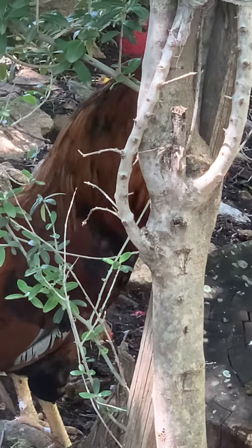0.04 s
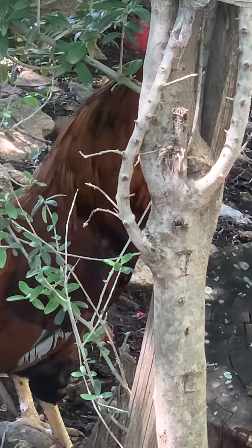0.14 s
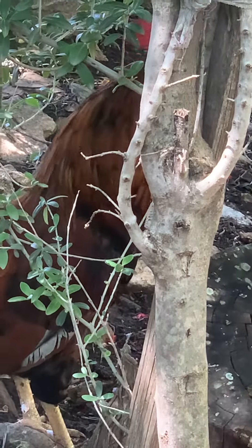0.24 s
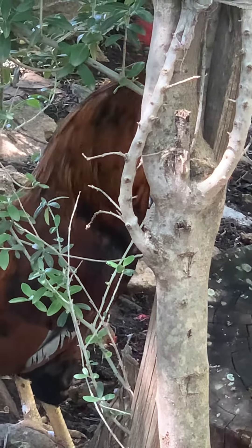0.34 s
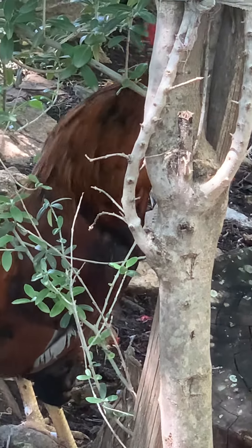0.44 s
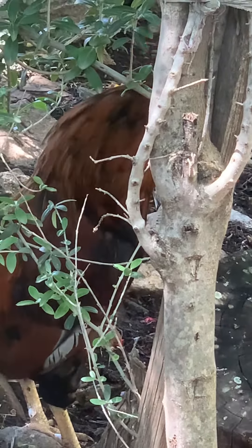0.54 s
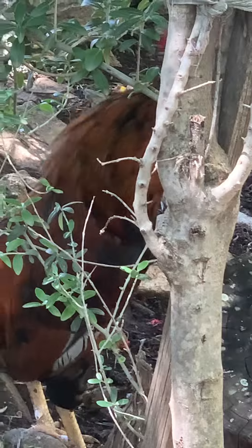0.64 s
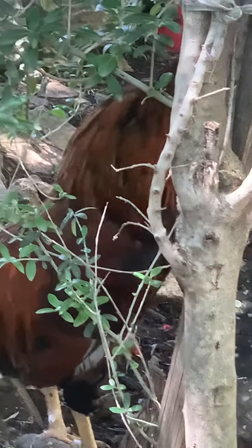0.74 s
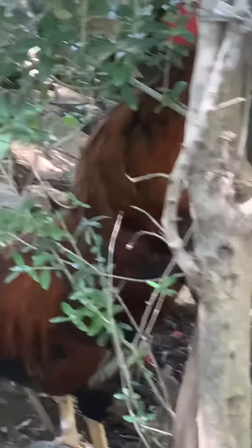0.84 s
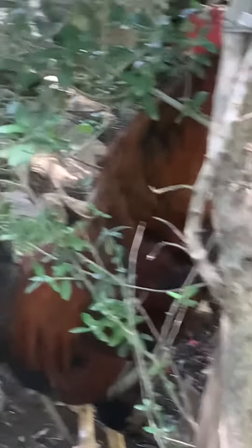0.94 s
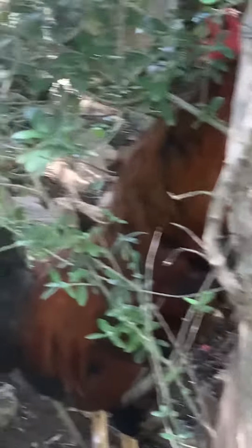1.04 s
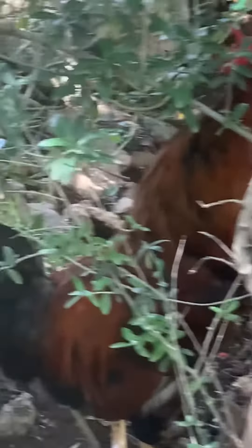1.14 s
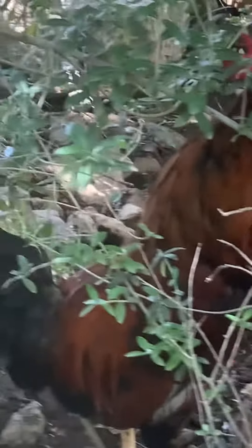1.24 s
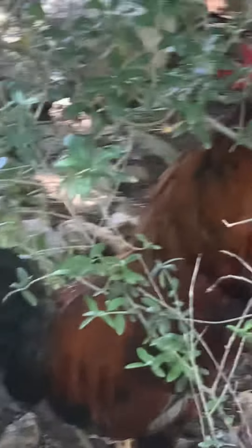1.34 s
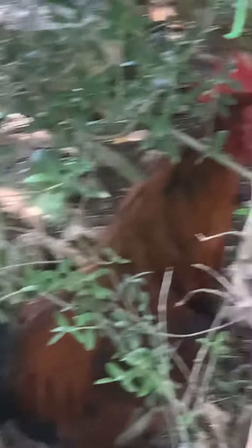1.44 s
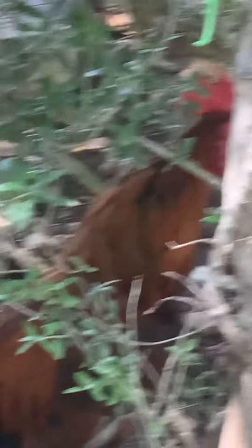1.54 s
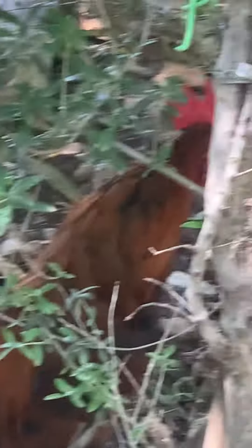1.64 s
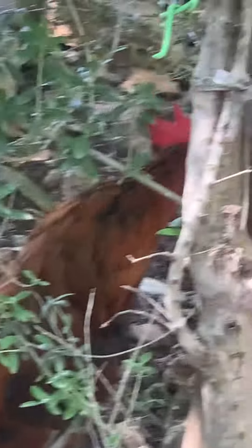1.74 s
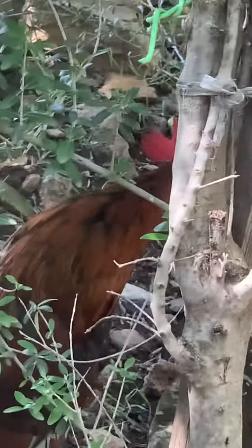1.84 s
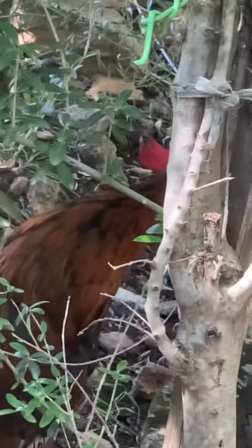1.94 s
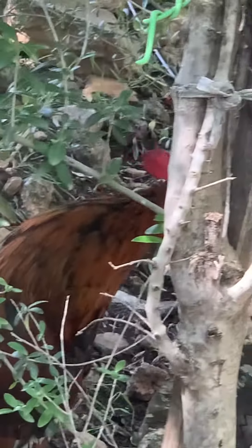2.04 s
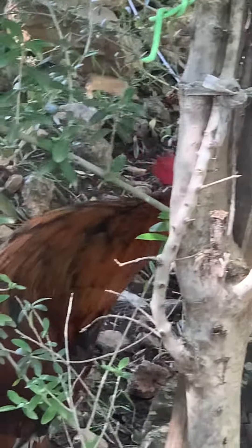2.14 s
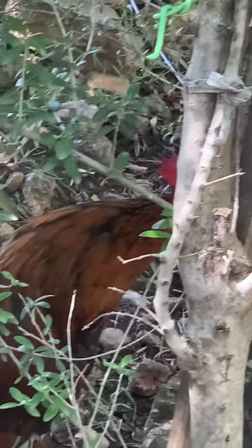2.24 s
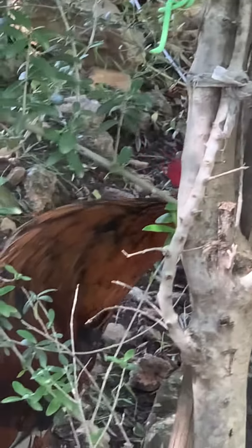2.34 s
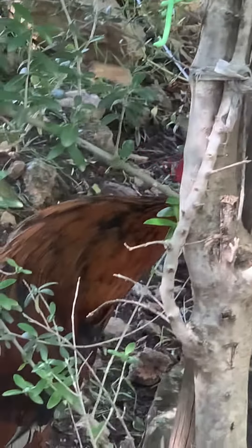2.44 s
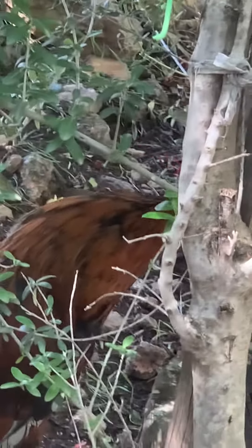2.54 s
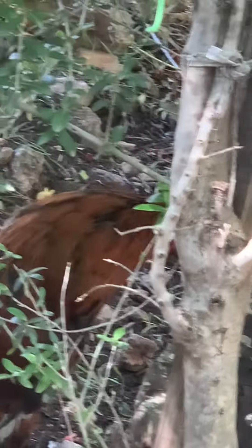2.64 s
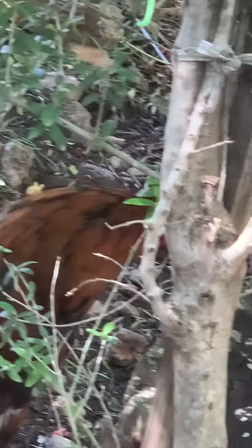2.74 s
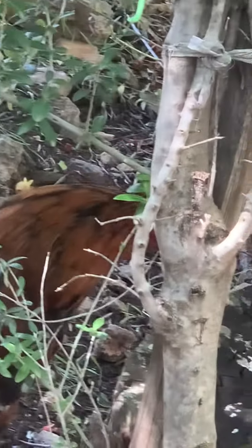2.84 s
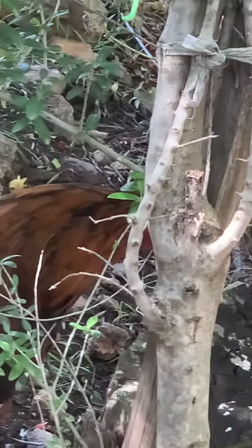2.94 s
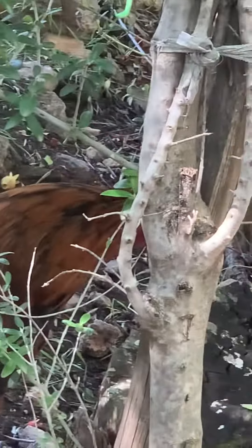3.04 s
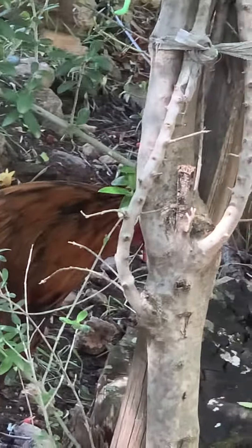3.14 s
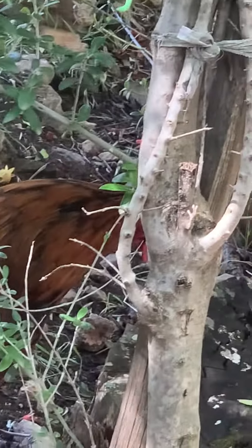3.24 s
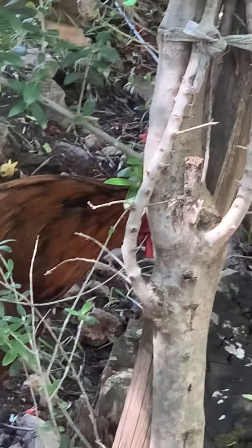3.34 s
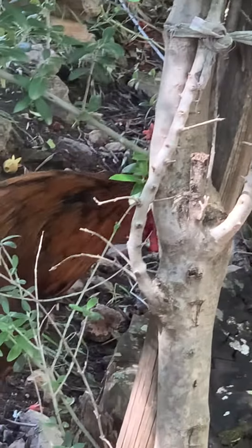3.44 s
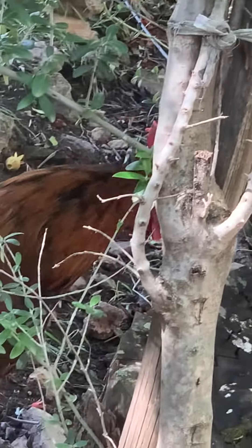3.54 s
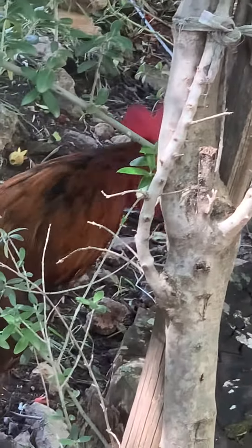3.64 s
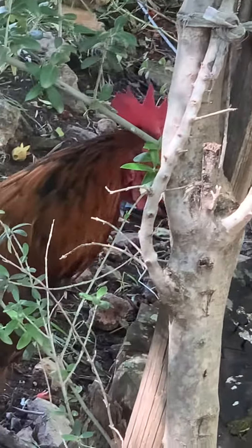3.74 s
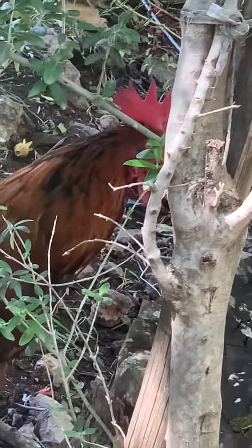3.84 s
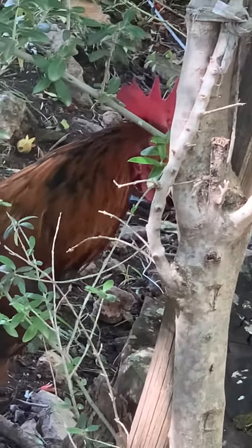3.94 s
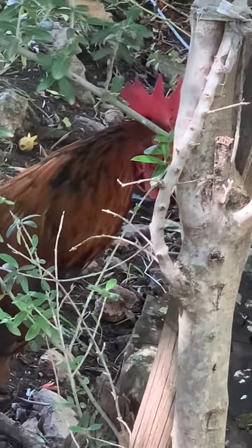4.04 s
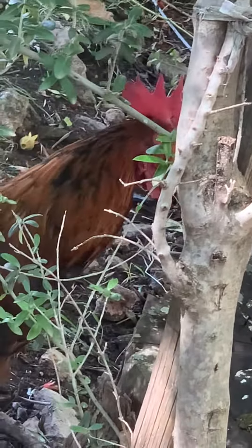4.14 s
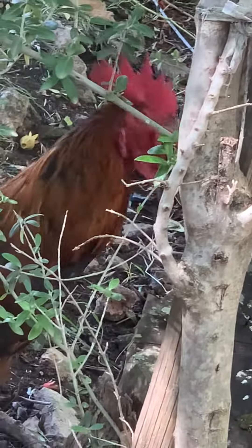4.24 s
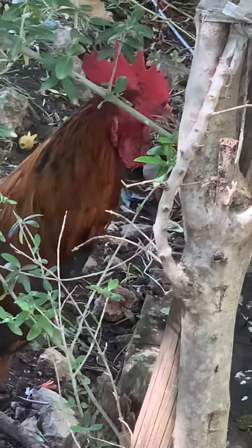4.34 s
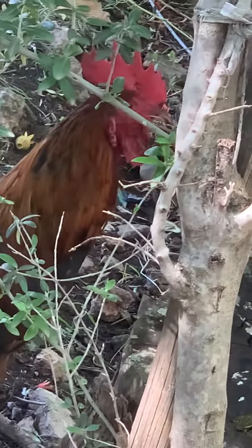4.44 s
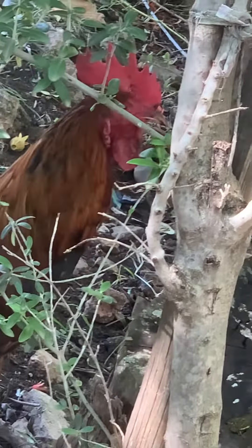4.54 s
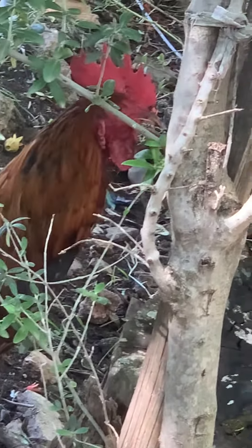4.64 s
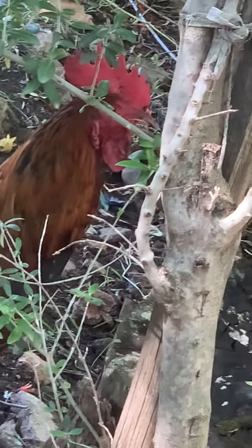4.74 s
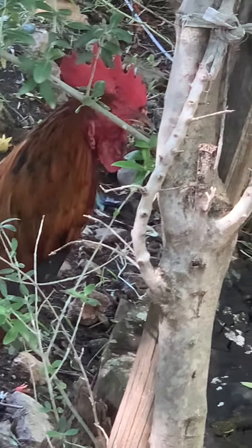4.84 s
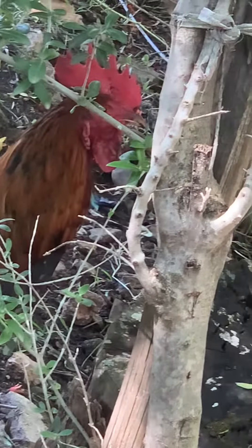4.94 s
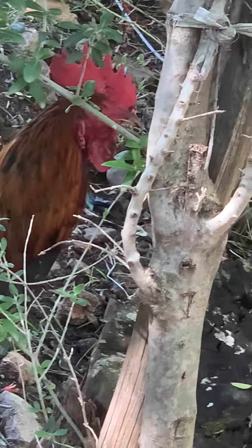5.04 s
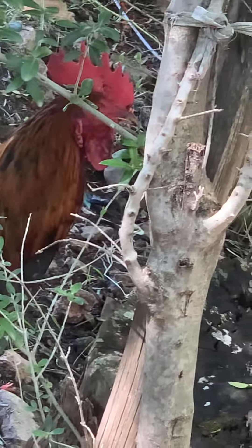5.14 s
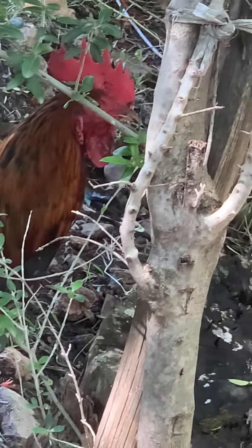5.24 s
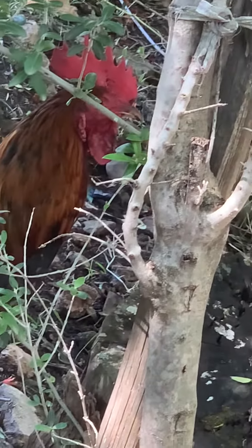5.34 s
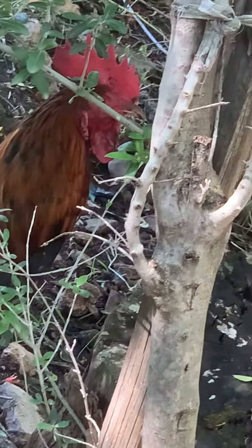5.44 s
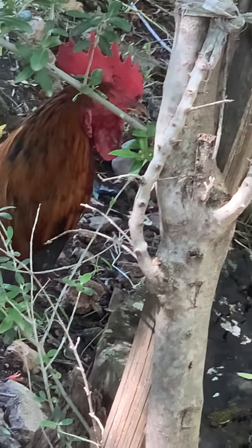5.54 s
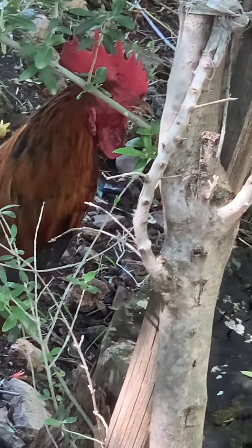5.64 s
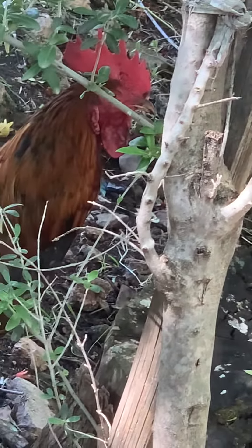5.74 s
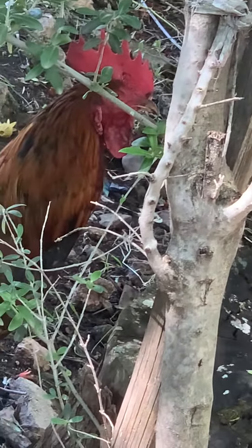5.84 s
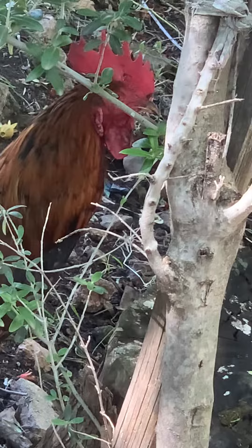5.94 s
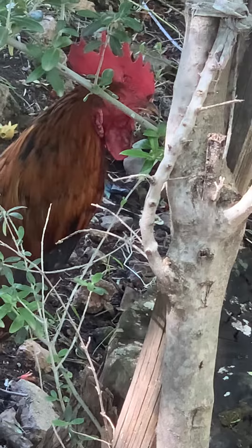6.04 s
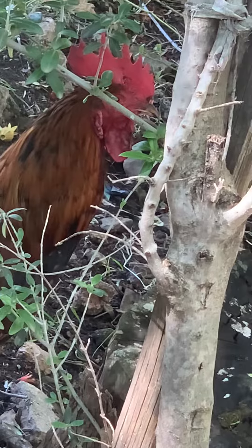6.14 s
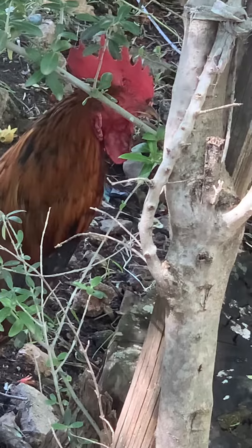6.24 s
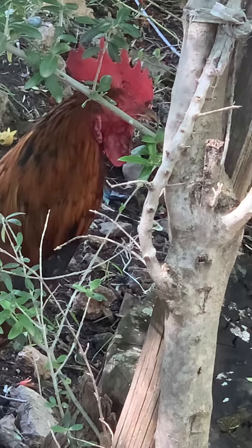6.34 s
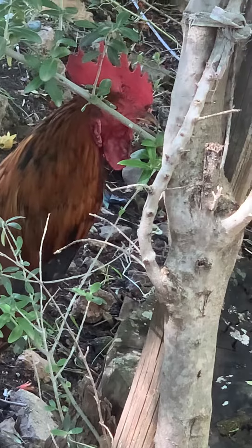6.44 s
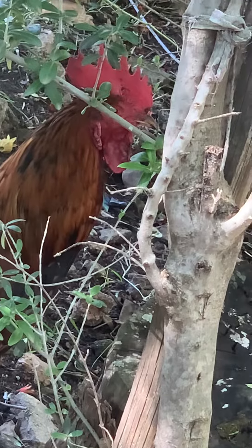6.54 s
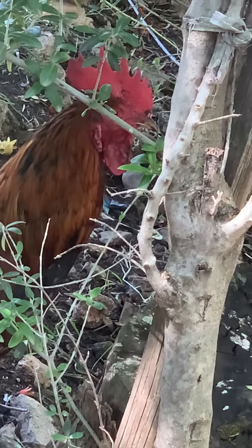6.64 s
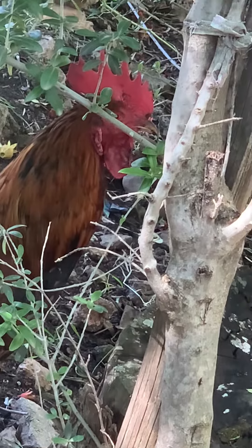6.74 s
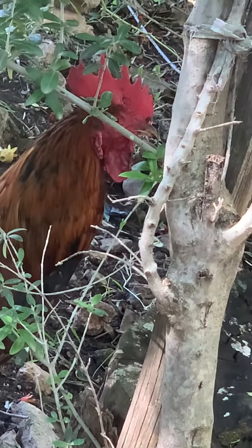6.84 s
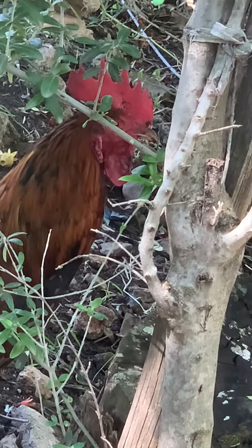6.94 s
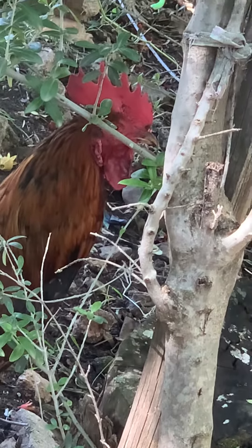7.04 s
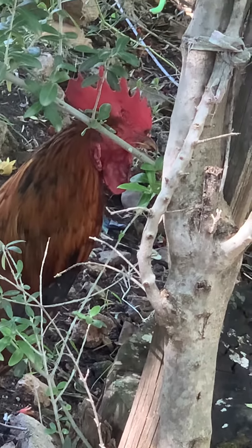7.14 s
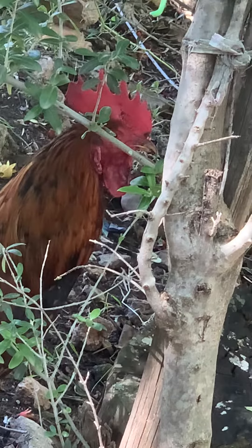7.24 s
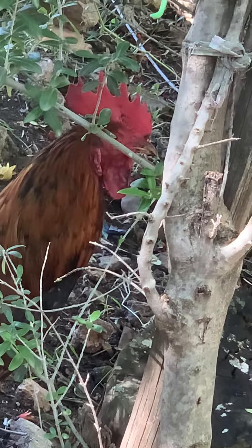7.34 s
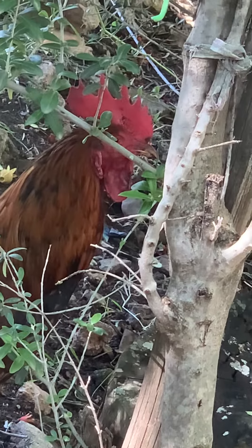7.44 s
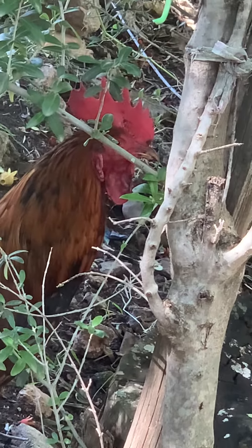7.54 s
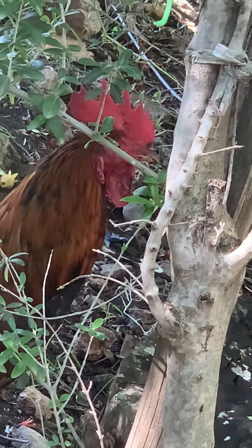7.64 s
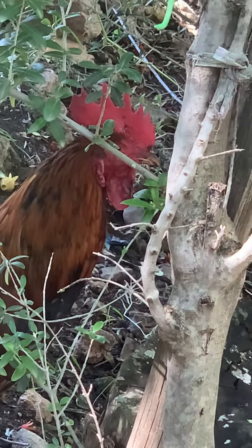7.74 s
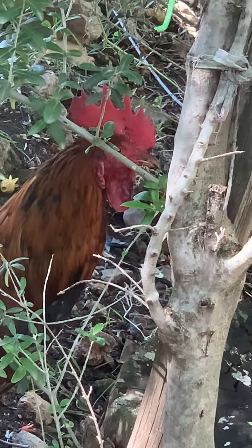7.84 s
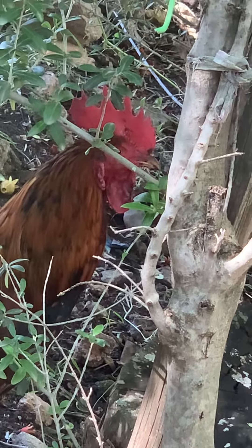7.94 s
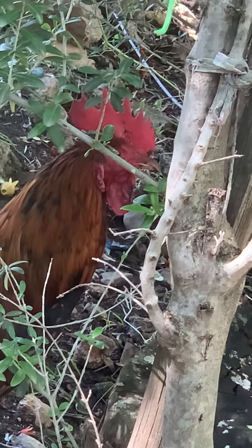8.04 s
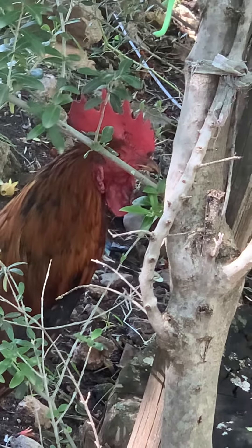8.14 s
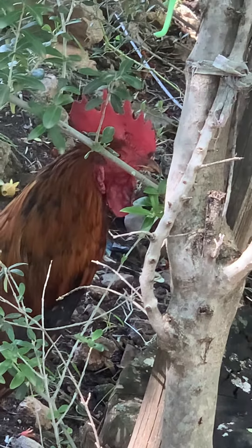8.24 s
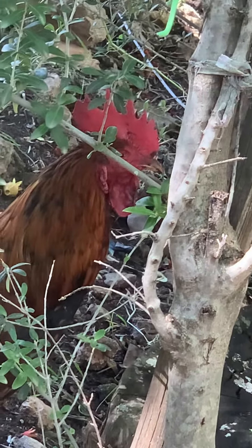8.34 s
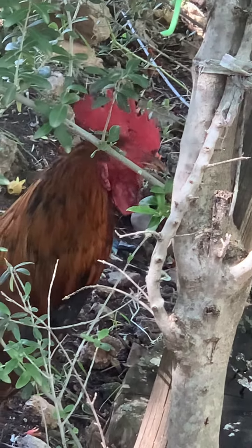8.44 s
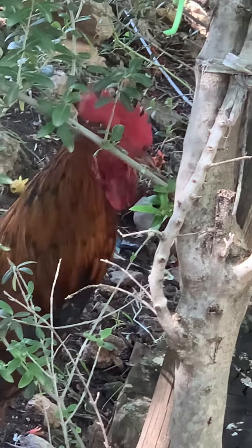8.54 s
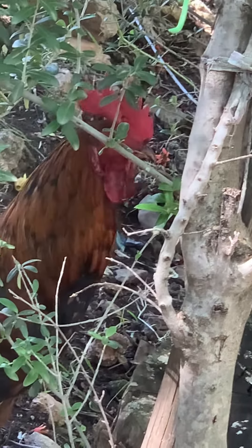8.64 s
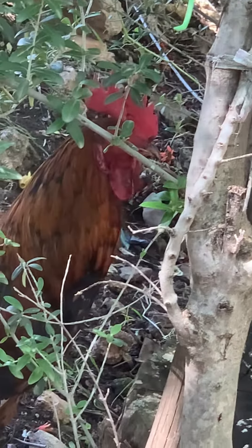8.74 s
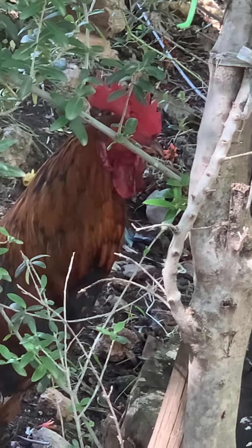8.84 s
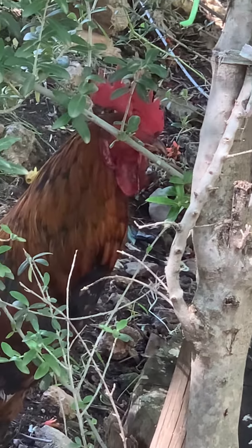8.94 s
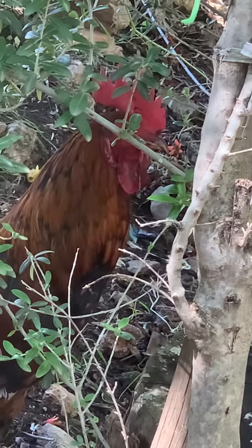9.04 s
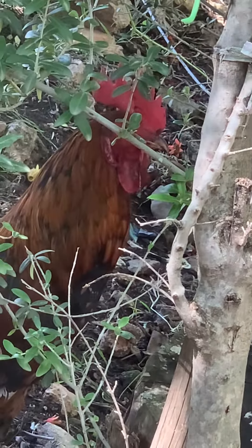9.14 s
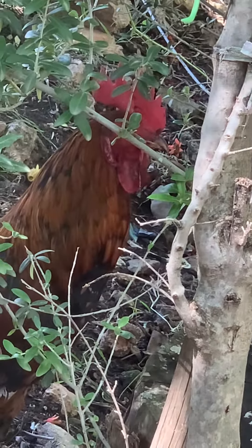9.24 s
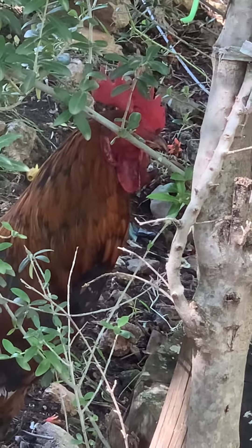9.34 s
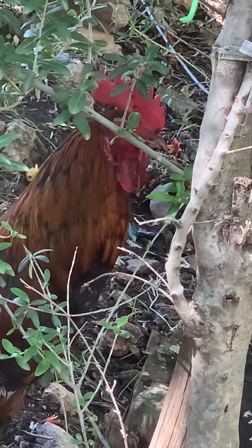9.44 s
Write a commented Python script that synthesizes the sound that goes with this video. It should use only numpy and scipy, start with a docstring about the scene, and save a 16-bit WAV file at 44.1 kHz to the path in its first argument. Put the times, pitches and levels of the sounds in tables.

```python
"""A leafy yard with far traffic, faint leaves and two distant engines of changing speed, heard throughout. From
0.6 s a near rooster crows once: a rasping syllable, then a long note that flips between registers, breaks into
rasps, clears and sags to a croak; pulses of a beating membrane ring its throat resonances. Gliding whistles and
hissy bird calls are scattered all through. Hoarse clucks follow the crow; far sine hoots start at 5.5 s. Just
after 9 s the rooster's beak snaps in quick strikes: ringing throat modes, scrape and litter noise."""
import sys
import numpy as np
from scipy import signal
from scipy.fft import rfft, irfft, next_fast_len
from scipy.io import wavfile
from scipy.ndimage import uniform_filter1d

SR = 44100
rng = np.random.default_rng(int(sys.argv[2]) if len(sys.argv) > 2 else 0)


def dump(signal):
    """Clip the signal to [-1, 1] and save it as 16-bit WAV at the path in sys.argv[1]."""
    limited = np.clip(np.atleast_2d(signal).T, -1, 1)
    pcm = np.round(limited * 32767).astype(np.int16)
    wavfile.write(sys.argv[1], SR, pcm)


N = 419391
T = np.arange(N) / SR
SIZE = next_fast_len(N + SR, real=True)  # room for a one-second echo tail
FREQ = np.arange(SIZE // 2 + 1) * SR / SIZE
TOP_HZ = 15700  # upper limit of the recorder and of the throat's floor


def undb(db):
    """Logarithmic level: decibels to amplitude gain."""
    return 10 ** (np.asarray(db) / 20)


def curves(rows):
    """Linear interpolation: each column of a timed table becomes a control, one value a sample."""
    s, *columns = np.transpose(rows)
    return [np.interp(T, s, column) for column in columns]


def over_hz(points):
    """Spectral interpolation: (Hz, value) points joined on a log-frequency axis."""
    hz, value = np.transpose(points)
    return np.interp(np.log(FREQ + 1), np.log(hz + 1), value)


def shape(x, gain):
    """Linear filtering: multiply the spectrum by a gain per frequency."""
    return irfft(rfft(x, SIZE) * gain, SIZE)[..., :N]


def band(lo_hz, hi_hz):
    """Band-pass: the gain falls steeply outside two corner frequencies."""
    return 1 / (1 + (lo_hz / (FREQ + 1)) ** 16) / (1 + (FREQ / hi_hz) ** 16)


def unit(x):
    """Normalization: scale to rms 1."""
    return x / np.sqrt(np.mean(x ** 2))


def walk(rate):
    """Low-rate noise: a smooth random control with about rate new values a second and rms 1."""
    k = max(int(SR / rate), 2)
    steps = np.repeat(rng.standard_normal(N)[:N // k + 1], k)
    return unit(uniform_filter1d(steps, k)[:N])


def add(track, s, sound):
    """Superposition: mix a short sound in at time s."""
    i = int(s * SR)
    track[i:i + len(sound)] += sound[:max(N - i, 0)]


def arch(length):
    """Half-sine envelope: progress 0-1 through a note, and its rounded swell."""
    u = np.linspace(0, 1, int(length * SR))
    return u, np.sin(np.pi * u)


def episode(start, length, edge_s):
    """Smooth gating: a control that rises to 1 at start and falls back after length."""
    return (np.tanh((T - start) / edge_s) - np.tanh((T - start - length) / edge_s)) / 2


def echoes(x, t60, patchy=.6):
    """Diffuse reverberation off walls and leaves: few strong, many weak reflections, unrelated left and right."""
    t = T[:SR]
    chance = rng.standard_normal((2, SR))
    reflections = chance * np.abs(chance) ** (3 * patchy)
    tail = reflections * undb(-60 * t / t60) * np.minimum(t / .012, 1)
    return shape(x, rfft(tail / np.sqrt(np.sum(tail[0] ** 2)), SIZE))


# noise spectrum of the far traffic, before its low-end contour: freq_hz [Hz], density_db [relative dB per Hz]
TRAFFIC_SPECTRUM = [(15, -48.5), (25, -14), (53, 3.5), (71, 0.5), (93, -17.5), (176, -21.5), (219, -11.5),
                    (394, -25), (438, -24.5), (515, -28.5), (588, -35), (1630, -44), (2070, -52),
                    (3930, -55), (15000, -76.5)]
# slow swell of the traffic: time_s [s], swell_db [dB above TRAFFIC_DB]
TRAFFIC_SWELL = [(0, 3.5), (1.5, 2.5), (3.5, 5), (5, 4), (7, 6), (8.5, 5), (9.5, 10)]
TRAFFIC_DB = -56.5


def far_traffic(side_hz=900):
    """Mid-side coherence: shaped noise with rumble nearly alike on both sides and a faint, wide hiss."""
    low_contour = [(40, -7.5), (55, -10.5), (90, 0.5), (160, 4.5), (230, -1.0), (350, 0.5)]
    spectrum = undb(over_hz(TRAFFIC_SPECTRUM) + over_hz(low_contour))
    mid, side = shape(rng.standard_normal((2, N)), spectrum)
    size = np.std(shape(mid, band(60, 15200)))
    side = shape(side, np.clip(FREQ / side_hz, .1, .9))
    swell_db, = curves(TRAFFIC_SWELL)
    level = undb(TRAFFIC_DB + swell_db + 0.486 * walk(33.0))
    return (mid + side * np.array([[1], [-1]])) / size * level


LEAVES_DB, LEAF_GUST_DB, LEAF_FLUTTER_DB = -87, 3, 3  # mean level, rms of slow gusts and of quick flutter


def leaves():
    """Friction noise: leaves brush each other in light gusts, a faint, grainy rustle."""
    grains = rng.standard_normal((2, N)) * np.exp(.8 * walk(700))
    mid, side = shape(grains, band(1800, 6000) * 2000 / (FREQ + 2000))
    rustle = unit(mid + .5 * side * np.array([[1], [-1]]))
    return rustle * undb(LEAVES_DB + LEAF_GUST_DB * walk(3) + LEAF_FLUTTER_DB * walk(22))


# speed of the smoother engine: time_s [s], firing_rate_hz [Hz, before wobble]
MOTOR_SPEED = [(0, 57.5), (2.8, 50), (3.6, 52), (5.3, 65), (6.4, 68.5), (7.3, 70), (8.26, 71), (9.5, 72.5)]
# its loudness: time_s [s], level_db [dB]
MOTOR_LEVEL = [(0, -77.5), (2.8, -55.5), (3.999, -48.5), (5, -50), (6, -49), (8.2, -47.5), (9.5, -45)]
# its exhaust pipe resonances: freq_hz [Hz], gain_db [relative dB]
MOTOR_PIPE = [(110, -2.5), (165, -13.5), (195, -7.5), (215, -0.5), (260, -0.5), (290, -5.5), (340, -32),
              (520, -18.5), (620, -40)]
# speed of the heavy, labouring engine: time_s [s], firing_rate_hz [Hz, before wobble]
TRUCK_SPEED = [(0, 53), (3.5, 46.5), (4.25, 60.5), (4.95, 50.5), (5.6, 66.5), (6.85, 51.5), (8.35, 60.5),
               (8.95, 74), (9.5, 71.5)]
# its swells: time_s [s], level_db [dB]
TRUCK_LEVEL = [(0, -75), (1.2, -59.5), (1.452, -43.5), (2.4, -44), (2.749, -58), (3.5, -44.5), (3.949, -63),
               (4.25, -44.5), (4.6, -41), (5.1, -50.5), (6.6, -55), (7.049, -42), (7.7, -45), (8.35, -40),
               (8.75, -47.5), (9.5, -45.5)]
# its exhaust pipe resonances: freq_hz [Hz], gain_db [relative dB]
TRUCK_PIPE = [(45, 0.5), (80, 7.5), (105, -18), (165, -12), (240, -33), (400, -33.5)]


def engine(speed, level, pipe, waver_db, wobble):
    """Source and filter: firing harmonics slide through fixed pipe resonances and waver on the way."""
    (hz,), (db,) = curves(speed), curves(level)
    phase = 2 * np.pi * np.cumsum(hz * (1 + wobble * walk(14))) / SR
    note = 0
    for k in range(1, 9):
        harmonic_db = np.interp(k * hz, *np.transpose(pipe)) + waver_db * walk(10.0)
        note = note + undb(harmonic_db) * np.sin(k * phase)
    return undb(db) * unit(note)


# soft far hoots, perhaps of a dove: start_s [s], pitch_hz [Hz, at the onset], level_db [dB, without echoes]
HOOTS = [(5.55, 570, -58), (6.18, 548, -58), (6.6, 540, -57.5), (7.4, 535, -57.5), (7.98, 515, -58),
         (8.53, 520, -54.5), (9.18, 530, -60.5)]


def hoots(hoot_s=0.14, sag=0.03):
    """Pure tones in a diffuse field: hoots sink by the share sag, blurred by echoes."""
    track = np.zeros(N)
    u, swell = arch(hoot_s)
    for s, hz, db in HOOTS:
        phase = 2 * np.pi * np.cumsum(hz * (1 - sag * u)) / SR
        add(track, s, undb(db) * swell * np.sin(phase))
    return track + echoes(track, t60=0.58)


def husky(s, length, hz0, hz1, husk, flutter):
    """Frequency modulation: a gliding whistle whose pitch is shaken by a quick flutter."""
    u, swell = arch(length)
    shake = np.roll(flutter, -int(s * SR))[:len(u)]
    glide = (hz0 + (hz1 - hz0) * u) * (1 + husk * shake)
    return swell * np.sin(2 * np.pi * np.cumsum(glide) / SR)


# thin hissy calls of a bird in the trees: start_s [s], level_db [relative dB]
HISSY_CALLS = [(0.5, -56), (3.882, -71), (4.13, -75), (4.63, -50), (4.968, -50), (5.387, -52), (5.54, -60),
               (5.908, -61), (6.248, -55), (8.138, -57), (8.501, -47), (9.064, -52.5), (9.438, -56)]
# three bands of each call: delay_s [s], length_s [s], start_hz [Hz], end_hz [Hz] (both before scatter),
# level_db [relative dB], huskiness [share of the pitch]
HISSY_BANDS = [(0, .105, 6150, 5600, 0, .052), (.005, .1, 4750, 4400, -8, .07),
               (.02, .16, 3950, 3650, -5.5, .05)]
HISSY_SCATTER = .015  # random detuning of each band in each call, share of the pitch


def hoarse_calls():
    """Noise-like modulation: a high band leads, lower ones join, all slide down and stutter."""
    track, flutter = np.zeros(N), walk(900)
    for s, db in HISSY_CALLS:
        for delay, length, hz0, hz1, part_db, husk in HISSY_BANDS:
            tune = 1 + HISSY_SCATTER * rng.standard_normal()
            call = husky(s + delay, length, tune * hz0, tune * hz1, husk, flutter)
            add(track, s + delay, undb(db + part_db) * call)
    track = track * undb(2 * walk(110) - 4)  # grainy stutter
    return undb(-3) * (track + undb(2.5) * echoes(track, t60=.6, patchy=.9))


# whistled bird notes, plus one low soft whine of the rooster just after 3.5 s: start_s [s], length_s [s], #
# start_hz [Hz], end_hz [Hz], level_db [relative dB], huskiness [share of the pitch]
WHISTLES = [(.01, 0.036, 3960, 3770, -64.5, 0.043), (0.268, 0.25, 3830, 3860, -72.5, 0.058),
            (3.577, 0.06, 599, 637, -48, .06), (4.193, 0.08, 4600, 3110, -70, .08),
            (6.036, 0.058, 3223, 3240, -57.5, .012), (6.122, 0.034, 2860, 2590, -62, .02),
            (6.163, 0.047, 2396, 2065, -57, .01), (6.192, 0.042, 3690, 3850, -60, .02),
            (6.245, 0.045, 4180, 3870, -64, .04), (6.252, 0.03, 1620, 1950, -68, .04),
            (6.281, 0.022, 2210, 2780, -57, .02), (6.325, .045, 3850, 3170, -61, .08),
            (6.367, 0.041, 2530, 2420, -58, .03), (6.393, 0.028, 2790, 3180, -64, .04),
            (6.401, 0.056, 1935, 1590, -66.5, .07), (6.439, 0.022, 1990, 2154, -58.5, .02),
            (6.506, 0.054, 3204, 3037, -55.5, .012), (6.614, .035, 2626, 2340, -56, .015),
            (6.669, 0.037, 2250, 2010, -58.5, .01), (6.771, 0.037, 1910, 1640, -66.5, .07),
            (6.792, 0.029, 2256, 2660, -60, .04), (6.842, 0.069, 4000, 2810, -67.5, .08),
            (6.897, 0.024, 2440, 2570, -57.5, .02), (6.936, 0.041, 1930, 1565, -66.5, .07),
            (7.075, 0.03, 2900, 3120, -64, .015), (7.089, 0.045, 5140, 4500, -65, .012),
            (7.135, .04, 4300, 3400, -69, .02), (7.843, 0.035, 3700, 4170, -61.5, .008),
            (7.905, .05, 4450, 3550, -61, .008)]


def warbles():
    """Gliding tones with scattering: whistled notes, some clear and some husky, echoed by the trees."""
    track, flutter = np.zeros(N), walk(900)
    for s, length, hz0, hz1, db, husk in WHISTLES:
        add(track, s, undb(db) * husky(s, length, hz0, hz1, husk, flutter))
    return undb(7.5) * (track + undb(-4.5) * echoes(track, t60=.45, patchy=.3))


# the beak snaps in quick strikes: start_s [s], level_db [relative dB]
SNAPS = [(9.042, -43.5), (9.056, -48), (9.077, -55)]
# throat modes that each snap sets ringing: freq_hz [Hz], level_db [relative dB], t60_s [s]
SNAP_MODES = [(1040, -11, .07), (1465, 0, .26), (1540, -9, .12), (2850, -1, .15), (2990, -8, .12),
              (3480, -6, .12), (3940, -7, .1), (4260, -8, .14)]


def beak_snap(scrape_db=-5, litter_db=-17):
    """Impact and modal decay: the beak snaps shut with a scrape, throat modes ring on, crumbs of litter settle."""
    t, track = T[:SR // 2], np.zeros(N)
    for s, blow_db in SNAPS:
        ring = 0
        for hz, db, t60 in SNAP_MODES:
            decay = undb(db - 60 * t / t60 + 3 * walk(300)[:len(t)])
            ring = ring + decay * np.sin(2 * np.pi * hz * t + .45 * walk(200)[:len(t)])
        scrape = undb(scrape_db) * rng.standard_normal(len(t)) * np.exp(-t / .013)
        # cubed noise is sparse, like crumbs
        litter = undb(litter_db) * unit(rng.standard_normal(len(t)) ** 3) * np.exp(-t / .11)
        add(track, s, undb(blow_db) * (.8 * ring + scrape + litter) * np.minimum(t / .003, 1))
    color = [(300, -6), (900, 2), (4200, 0), (5200, -6), (9000, -7), (10500, -16), (14000, -15)]
    return shape(track, undb(over_hz(color)))


# clucks: start_s [s], length_s [s], pitch_hz [nominal Hz], level_db [relative dB],
# click_db [dB against the cluck]
CLUCKS = [(3.53, .04, 520, -45, -8), (3.688, .04, 500, -49.5, -11), (3.862, .026, 450, -52, -13),
          (4.082, .028, 520, -63, -6)]
SCUFF_DB, SCUFF_S = -11, .075  # litter stirred by each cluck: dB against the cluck, decay time constant


def clucks():
    """Harmonic source with transients: short hoarse grunts, a soft beak tick and a scuff of dry litter."""
    grunts, ticks, scuffs = np.zeros((3, N))
    t = T[:SR // 2]
    for s, length, hz, db, click_db in CLUCKS:
        u, swell = arch(length)
        noise = rng.standard_normal(SR)[:len(u)]
        pitch = hz * (.9 + .15 * swell + .9 * uniform_filter1d(noise, size=30))
        phase = 2 * np.pi * np.cumsum(pitch) / SR
        grunt = sum(np.sin(k * phase) * undb(-4.5 * abs(k - 1.7)) for k in range(1, 7))
        add(grunts, s, undb(db) * swell * grunt)
        add(ticks, s + .004, undb(db + click_db) * 2 * noise * np.exp(-2.5 * u))
        crumbs = unit(rng.standard_normal(len(t)) ** 3)
        add(scuffs, s, undb(db + SCUFF_DB) * 2 * crumbs * np.exp(-t / SCUFF_S))
    tick_color = [(300, -4), (1200, 0), (2900, 0), (4300, -3), (5200, -11), (8000, -10), (14000, -23)]
    scuff_color = [(300, 4), (900, 4), (2000, -5), (4000, -8), (7000, -20), (14000, -28)]
    return grunts + shape(ticks, undb(over_hz(tick_color))) + shape(scuffs, undb(over_hz(scuff_color)))


TIRES_S, TIRING_S = 2.65, .4  # when the voice starts to tire, and over how long


def fatigue():
    """Linear onset: 0 while the crow is fresh, rising to 1 as it runs out."""
    return np.clip((T - TIRES_S) / TIRING_S, 0, 1)


# a second membrane beats against the first: start_s [s], length_s [s], roughness [about 0-1],
# beat_hz [Hz, before irregularity], surge_db [dB on the beak resonance]
BREAKS = [(.591, 0.063, 0.62, 239.1, 2), (0.657, 0.11, 0.92, 149.8, 3), (0.765, 0.038, 0.35, 170.3, 2),
          (0.887, 0.024, 0.84, 164.7, -1), (0.919, 0.039, 0.1, 169.2, -0.5),
          (0.953, 0.013, 0.46, 174.1, 3.5), (0.983, 0.12, 0.35, 160.5, 3), (1.112, 0.013, 1.08, 159.1, 1.5),
          (1.127, .073, 0.4, 161.4, 3), (1.203, .038, .7, 149.7, 2.5), (1.242, .028, .35, 160, -0.5),
          (1.272, 0.28, 0.74, 145, 2), (1.796, .16, .065, 204.8, 0.5), (1.961, 0.033, 0.29, 129.6, -1.5),
          (1.998, .136, 0.89, 120.3, 2), (2.136, 0.13, 0.68, 105.3, 4), (2.3, .04, .85, 106.5, 4.5),
          (2.858, .09, 0.18, 285.6, -0.5), (3.037, 0.022, 0.59, 268, 4), (3.111, 0.029, 0.36, 251.5, 3),
          (3.22, .035, .33, 235.2, 2), (3.353, 0.026, 0.14, 215.2, 12.5), (3.381, 0.03, 1.02, 210.5, 5.5),
          (3.411, 0.016, 0.35, 213.2, 11.5), (3.436, 0.019, 0.58, 211.9, 3)]
BREAK_S = 0.0037  # time constant with which a break sets in and clears
CLEAR_ROUGH, CLEAR_BEAT_HZ = .032, 219.8  # between the breaks
TIRED_ROUGH = .04  # roughness that fatigue adds


def breaks():
    """Membrane coupling: roughness, beat rate and surge depart from a clear voice during each break."""
    rough, beat_hz, surge_db = CLEAR_ROUGH, CLEAR_BEAT_HZ, 0
    for start, length, roughness, hz, db in BREAKS:
        on = episode(start, length, BREAK_S)
        rough = rough + on * (roughness - CLEAR_ROUGH)
        beat_hz = beat_hz + on * (hz - CLEAR_BEAT_HZ)
        surge_db = surge_db + on * db
    return np.clip(rough + TIRED_ROUGH * fatigue(), 0, 1), beat_hz, surge_db


# upper-register pitch, one curve a syllable: time_s [s], pitch_hz [Hz, before flips and jitter]
PITCH = [
    [(.6, 505), (.65, 515), (.68, 565.6), (.755, 615.3), (.778, 755), (.805, 720)],
    [(.895, 670.5), (.97, 735.2), (1.2, 752), (1.32, 717.3), (1.46, 774.6), (1.565, 775), (1.595, 744.2),
     (1.85, 755.5), (2.23, 740.5), (2.43, 743.7), (3.03, 669.7), (3.27, 614.3), (3.36, 548)],
]
# flips to a lower register: start_s [s], length_s [s], depth [share of the pitch]
FLIPS = [(0.876, 0.11, 0.13), (0.997, 0.0046, 0.15), (1.028, 0.016, 0.097), (1.06, 0.017, 0.14),
         (1.151, 0.0091, .12), (1.172, 0.014, .14), (1.241, .025, 0.145), (1.32, 0.015, 0.089),
         (2.259, 0.039, 0.082), (2.342, 1.08, .1)]
FLIP_S = 0.0014  # time constant of a flip
CHAOS, LOWER = .2, .4  # in a full rasp: random phase push [rad rms], strength of the lower membrane


def syrinx(rough, beat_hz, swing=0.72, throb=0.46, jitter=0.034, air_db=-25):
    """Coupled oscillators: a lower membrane's beat pushes the pulses' phase and strength; air hisses each cycle."""
    hz, = curves(np.vstack(PITCH))
    for start, length, depth in FLIPS:
        hz = hz * (1 - depth * episode(start, length, FLIP_S))
    hz = hz * (1 + jitter * rough * walk(200) + .001 * walk(70))
    # the harder the membranes collide, the less regular their beat
    irregular = (0.0301 + 0.23 * rough ** 2) * walk(150)
    beat = 2 * np.pi * np.cumsum(beat_hz * (1 + irregular)) / SR
    push = rough * (swing * np.sin(beat) + CHAOS * walk(520))
    phase = 2 * np.pi * np.cumsum(hz) / SR + push
    pulses = LOWER * rough * np.cos(phase - beat)
    turn, overtone = np.exp(1j * phase), 1
    for _ in range(30):  # equal harmonics sum to sharp pulses
        overtone = overtone * turn
        pulses = pulses + overtone.real
    air = rng.standard_normal(N) * (1 + np.cos(phase))
    sizzle = shape(air, undb(-42) + undb(-17) * band(9500, 16000))
    tired_hiss = shape(air, undb(-19) * band(2600, 5500) + undb(-8) * band(5500, 16000))
    voice = unit(pulses) * (1 + throb * rough * np.cos(beat))
    return voice + undb(air_db) * rough * air + sizzle + fatigue() * tired_hiss


# throat and beak resonances: freq_hz [Hz, relaxed], width_hz [Hz, before narrowing],
# strained_db [relative dB], relaxed_db [relative dB]
THROAT = [(619, 127, 2, -1.5), (1213, 280, -2, -33.5), (1440, 240, -1.5, 2.5), (1925, 167, -13, -5),
          (2930, 150, -21, -8), (3480, 190, -40, -16.5), (3917, 280, -27, -5.5), (4440, 260, -23, -54.5),
          (5530, 450, -25, -35), (6152, 190, -23, -7), (7140, 570, -30, -20), (8220, 270, -28.5, -24),
          (10600, 654, -42, -69.5), (11290, 730, -23.5, -29), (13790, 1400, -17, -13.5)]
# hollows between them: freq_hz [Hz], width_hz [Hz], depth_db [dB, relaxed]
HOLLOWS = [(2023, 42, -20.5), (2324, 200, -5.5), (4910, 270, -6.5), (6710, 120, -7.5)]


def throat(floor_db=-44, stretch=1.0064):
    """Formant filtering: steep-sided windpipe and beak resonances, strained (tuned higher) and relaxed."""
    tuning = np.array([[stretch], [1]])
    peaks = 0
    for hz, width, tight_db, slack_db in THROAT:
        detuning = (FREQ - hz * tuning) / (width * 0.95)
        peaks = peaks + undb([[tight_db], [slack_db]]) / (1 + detuning ** 2) ** 2
    hollows = sum(db * np.exp(-((FREQ - hz) / width) ** 2) for hz, width, db in HOLLOWS)
    hollow_depth = np.array([[.2], [1]])  # shallow when strained
    return (peaks + undb(floor_db) * band(444, TOP_HZ)) * undb(hollows * hollow_depth)


# neck stretched and beak wide open: time_s [s], strain [0-1]
STRAIN = [(.6, 0.3), (.9, 1), (1.55, 0.91), (1.65, 0.68), (2.2, .6), (2.36, 0.3), (2.6, 0.25)]
# one curve a syllable: time_s [s], beak_db [relative dB, beak resonance], low_db [relative dB, fundamental]
EFFORT = [
    [(.608, -41, -62), (.62, -28, -50), (.705, -27.5, -35.5), (.78, -24.5, -40), (.805, -29.5, -48)],
    [(.895, -29, -40.5), (.98, -21, -30), (1.22, -19.5, -30), (1.5, -19, -33), (1.8, -19.5, -40.5),
     (2, -23.5, -40.5), (2.27, -23, -38.5), (2.38, -23.5, -38.5), (2.6, -27, -36.5), (2.8, -32, -34.5),
     (3.04, -34, -28), (3.3, -33.5, -40.5), (3.46, -40, -45.5)],
]
# treble, one curve a syllable: time_s [s], rasp_db, sizzle_db, top_db [relative dB]
TREBLE = [
    [(0.61, -57.5, -57, -59.5), (0.696, -50.5, -47.5, -57), (0.77, -51.5, -62, -54), (0.8, -65, -74, -57.5)],
    [(0.9, -49, -65.5, -67), (0.93, -45.5, -64.5, -55.5), (1.14, -38.5, -56, -52.5),
     (1.27, -42, -58.5, -53), (1.41, -40.5, -49.5, -48), (1.5, -42, -47.5, -50.5),
     (1.72, -45.5, -61, -47.5), (2.03, -48.5, -49, -48.5), (2.2, -47.5, -48, -50.5), (2.34, -56, -47, -48),
     (2.41, -51, -56, -45.5), (2.8, -68, -57, -57), (2.85, -58, -49, -54), (3.26, -69, -60.5, -63),
     (3.4, -50.5, -58, -54.5), (3.45, -76, -73, -61)],
]
# the two syllables: start_s [s], end_s [s]
SYLLABLES = [(0.596, 0.8), (0.893, 3.458)]
ATTACK_S, RELEASE_S = .002, 0.0091  # time constants
FLICKER_DB, FLICKER_PER_S = 2, 39  # how far (rms) and how often the treble wavers
SHUDDER, SHUDDER_PER_S = .5, 180  # uneven bursts in a full rasp: depth 0-1, rate
TREMBLE, TREMBLE_PER_S, TREMBLE_STRETCH = 1.6, 45, 1.065  # drive, rate, tuning of the trembling throat


def crow(beak_db=-0.71, low_db=3.0, rasp_db=3, sizzle_db=2, top_db=1):
    """Source and filter: pulses ring a throat that slackens over the crow; rasps burst unevenly."""
    rough, beat_hz, surge_db = breaks()
    source = syrinx(rough, beat_hz) * (1 + SHUDDER * rough * np.tanh(2 * walk(SHUDDER_PER_S)))
    strained, relaxed = shape(source, throat())
    strain, = curves(STRAIN)
    # in a rasp the throat trembles: its resonances jump up and fall back
    tremble = np.clip(TREMBLE * rough * walk(TREMBLE_PER_S), 0, 1)
    raised = shape(source, throat(stretch=TREMBLE_STRETCH)[0])
    strained = strained + tremble * (raised - strained)
    voice = strain * strained + (1 - strain) * relaxed
    beak, low = curves(np.vstack(EFFORT))
    rasp, sizzle, top = (db + FLICKER_DB * walk(FLICKER_PER_S) for db in curves(np.vstack(TREBLE)))
    registers = [(400, 900, low + low_db),
                 (900, 2400, beak + surge_db + beak_db),
                 (2400, 5550, rasp + rasp_db),
                 (5550, 9500, sizzle + sizzle_db),
                 (9500, 15000, top + top_db)]
    out = 0
    for lo_hz, hi_hz, db in registers:
        part = shape(voice, band(lo_hz, hi_hz))
        running_rms = np.sqrt(uniform_filter1d(part ** 2, size=1900) + 1e-12)
        out = out + part / running_rms * undb(db)  # each band follows its own level curve
    sounding = 0
    for start, end in SYLLABLES:
        rise = (1 + np.tanh((T - start) / ATTACK_S)) / 2
        fall = (1 - np.tanh((T - end) / RELEASE_S)) / 2
        sounding = sounding + rise * fall
    return out * sounding


# phase by which the left microphone leads: freq_hz [Hz], lead_rad [rad]
LEAD = [(200, 0), (600, -1.4), (680, -2), (760, 0), (1000, -.3), (1250, .4), (1750, .3), (1950, 1.4),
        (3000, 2), (3750, 1.1), (4500, 2.2), (5300, 3.9), (6200, 5.1), (7500, 6.5), (8200, 7.7),
        (9400, 9.4), (11800, 12.3), (13200, 13), (15000, 15.7)]
# level of left minus right: freq_hz [Hz], pan_db [dB]
PAN = [(200, 0), (520, 2), (615, -1), (680, -10), (750, -14), (1000, -8), (1280, -5), (1420, -2),
       (1500, -5.5), (1580, -4), (1800, -7), (3000, 0), (4300, -2), (5300, 0), (15000, 0)]
ROAD_LAG_S = .00011  # far sounds reach the right microphone later


def scene():
    """Interaural differences: the near rooster stands off the microphone pair's axis; all else is far."""
    rooster = crow() + clucks() + beak_snap()
    pan, lead = over_hz(PAN) / 2, over_hz(LEAD) / 2
    left, right = undb(pan) * np.exp(1j * lead), undb(-pan) * np.exp(-1j * lead)
    direct = shape(rooster, np.array([left, right]))
    wall_color = [(500, -2.5), (2000, 5.0), (6000, 7.5), (14000, -3.5)]
    walls = echoes(shape(rooster, undb(over_hz(wall_color))), t60=0.3376)
    motor = engine(MOTOR_SPEED, MOTOR_LEVEL, MOTOR_PIPE, waver_db=4.5, wobble=0.0056)
    truck = engine(TRUCK_SPEED, TRUCK_LEVEL, TRUCK_PIPE, waver_db=3.5, wobble=0.076)
    birds = hoarse_calls() + warbles() + hoots()
    lag = np.exp(-2j * np.pi * FREQ * np.array([[0], [ROAD_LAG_S]]))
    far = shape(motor + truck + far_traffic() + leaves() + birds, lag)
    return direct + undb(-11.5) * walls + far * undb([[-.5], [.5]])


def record(dry):
    """Band limiting: the recorder cuts the top with a steep elliptic low-pass."""
    return signal.sosfilt(signal.ellip(8, .2, 70, TOP_HZ, fs=SR, output="sos"), dry)


dry = scene()
out = record(dry)
dump(out)
```